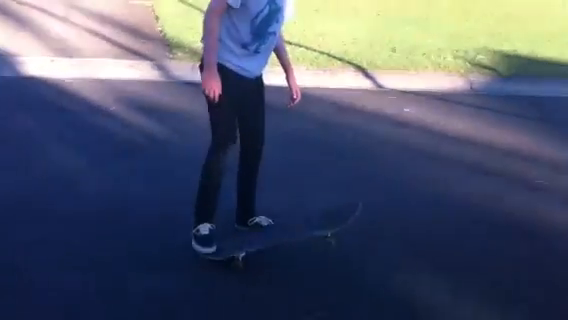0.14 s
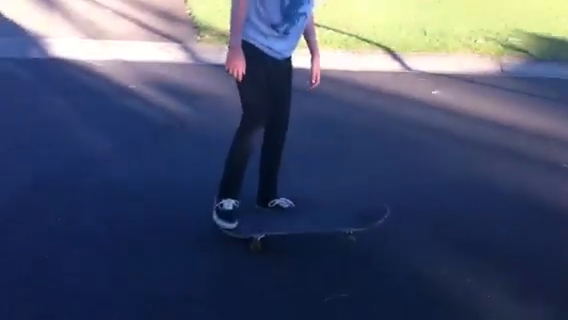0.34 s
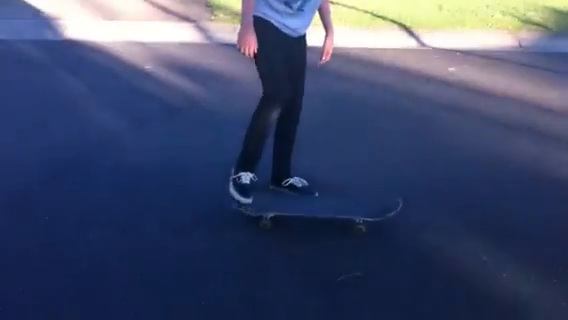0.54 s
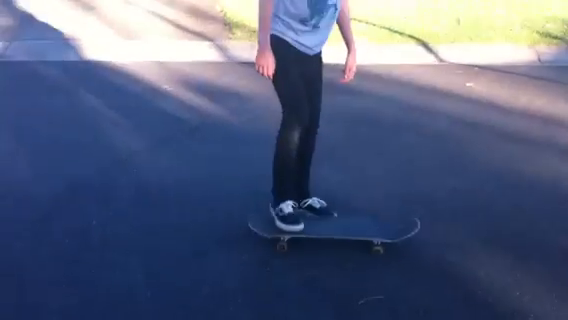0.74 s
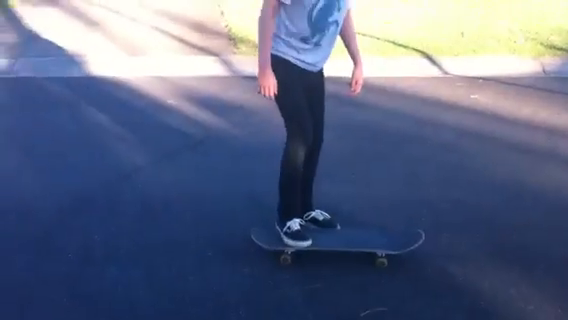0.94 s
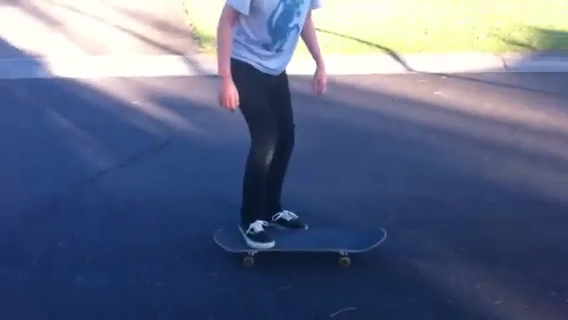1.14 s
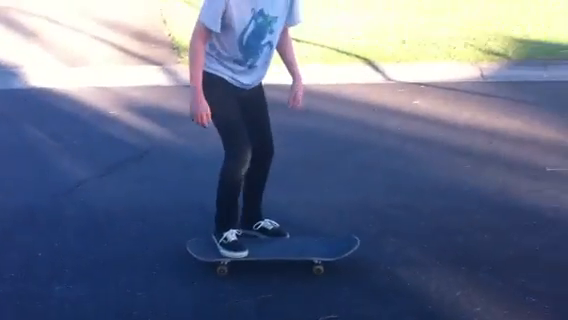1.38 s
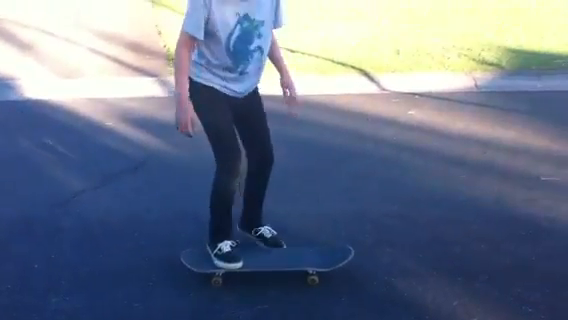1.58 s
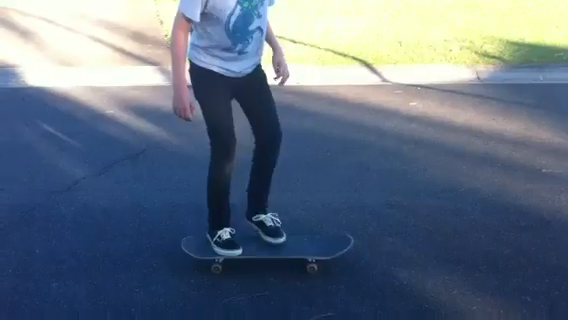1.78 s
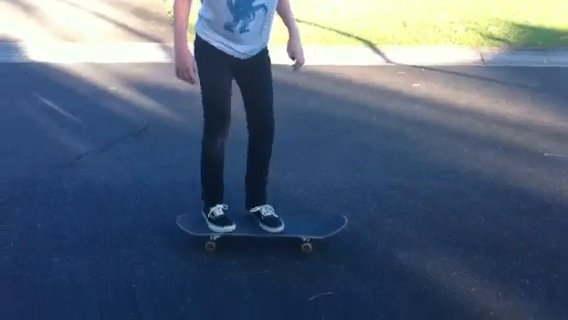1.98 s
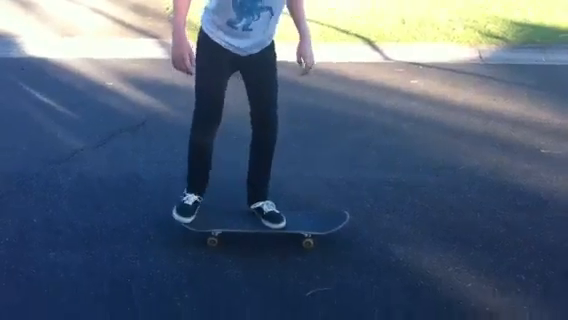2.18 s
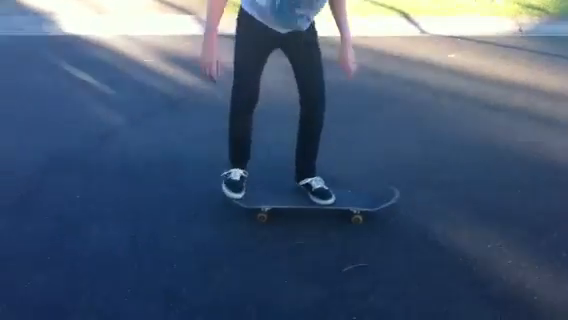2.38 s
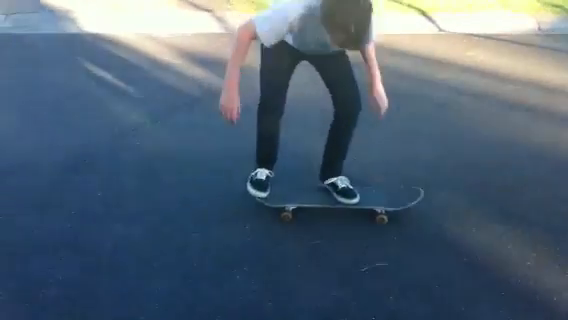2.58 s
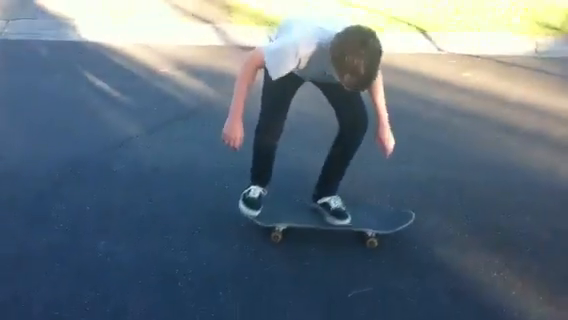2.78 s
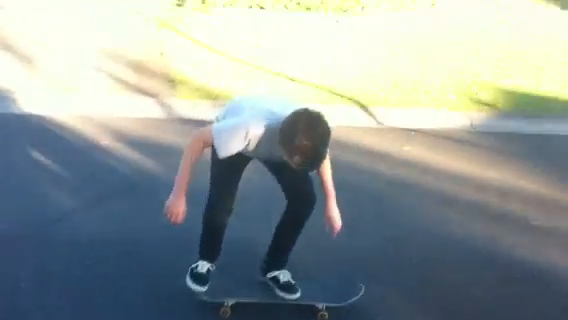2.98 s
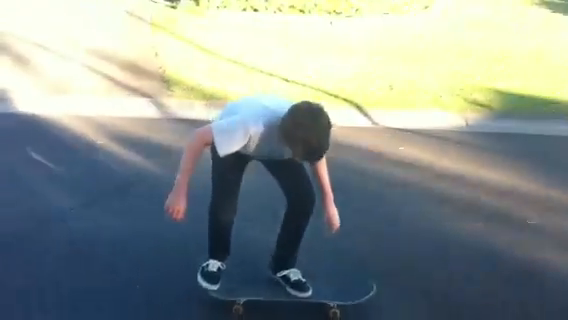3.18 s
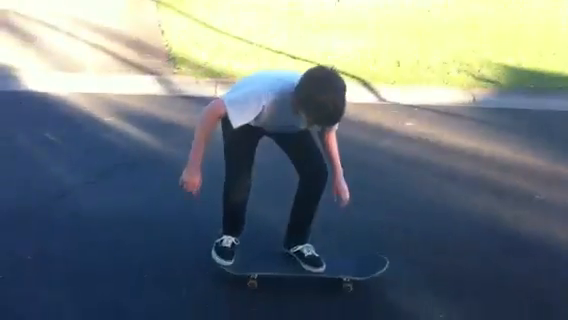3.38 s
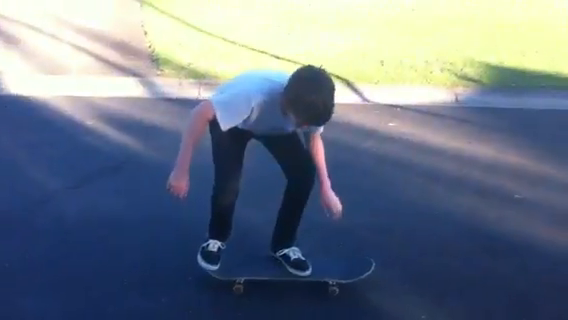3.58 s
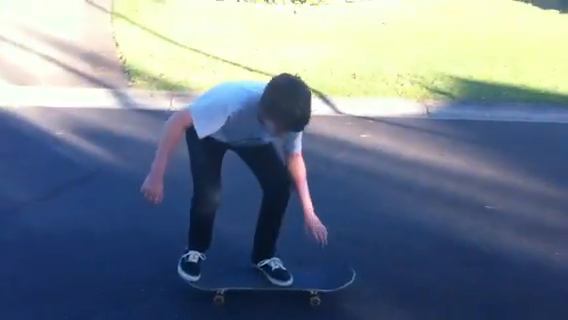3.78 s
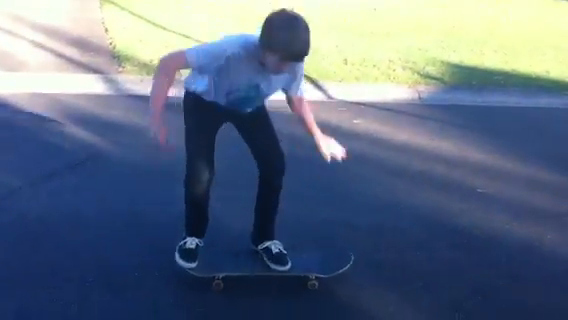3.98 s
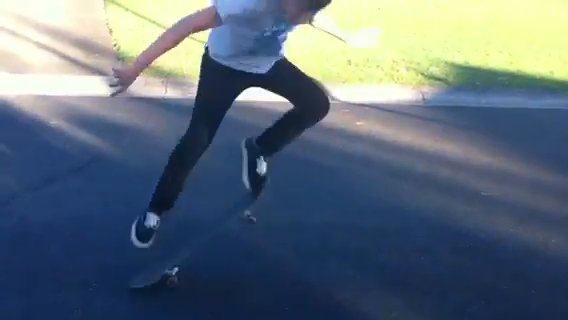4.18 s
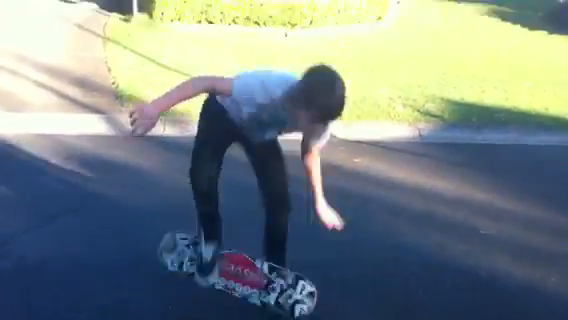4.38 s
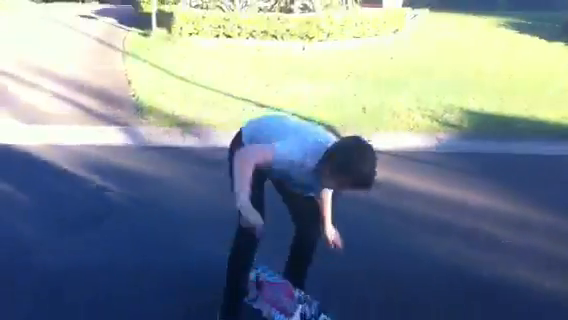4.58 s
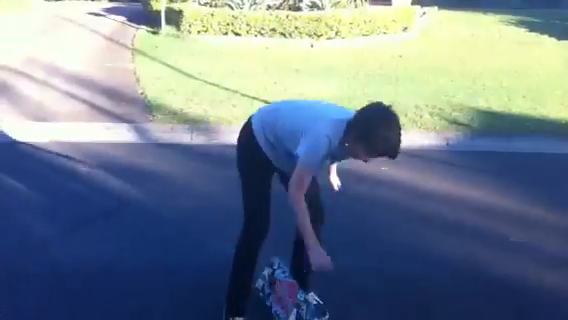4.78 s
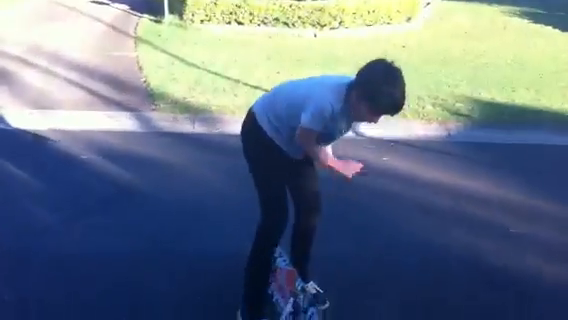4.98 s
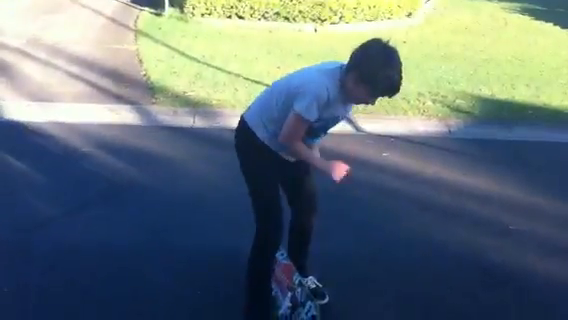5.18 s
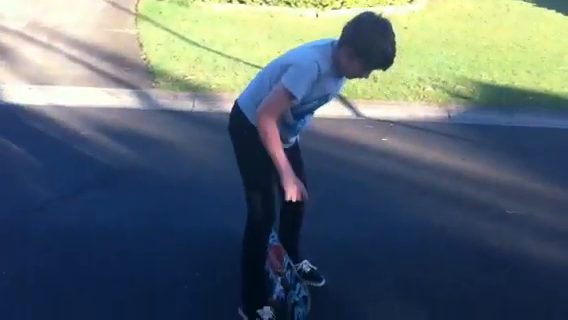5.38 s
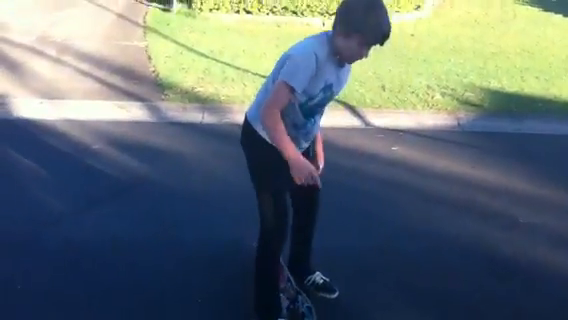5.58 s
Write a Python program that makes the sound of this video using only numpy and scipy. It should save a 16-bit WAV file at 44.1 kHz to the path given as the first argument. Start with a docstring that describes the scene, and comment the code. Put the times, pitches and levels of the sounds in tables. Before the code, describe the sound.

A close skateboard clacks down and rolls gently over asphalt, with light taps and hollow thumps from the rider's shoes. Birds screech, a few loudly and others far off. After a tail pop and a rasp of rubber on grip tape, the board hits the road hard, bounces and rattles to a stop, its wheels spinning down. One small microphone catches each knock echoing briefly around the hushed residential street.

```python
"""A quiet street between houses, one small microphone close to a skateboard rolling slowly on asphalt.
The front wheels slap down and the rider shuffles his feet. He pops the tail, his shoe scrapes up the
grip tape, and the board crashes onto the road and clatters to rest, deck, wheels and trucks ringing
at each blow. Birds screech, a few loud and several faint and far off; the houses throw every knock
back."""
import sys
import numpy as np
from scipy import signal
from scipy.fft import rfft, irfft, next_fast_len
from scipy.io import wavfile

SR = 44100
rng = np.random.default_rng(int(sys.argv[2]) if len(sys.argv) > 2 else 0)


def bounce(signal):
    """Save signal as a 16-bit WAV file at the path given by the first command-line argument."""
    frames = np.transpose(np.atleast_2d(signal))
    limited = np.clip(frames, -1, 1)
    pcm = np.round(limited * 32767).astype(np.int16)
    wavfile.write(sys.argv[1], SR, pcm)


N = 248633
TIME = np.arange(N) / SR
CUTOFF_HZ = 16000

# wheel slaps, shuffling feet, tail pop, crash and clatter:
# start_s, force_db, hardness_db_per_octave, favoured_hz (by the spot struck), favour_db
BLOWS = [ (.617, -36.5, 5.5, 685, 14.5), (0.6183, -40.5, 0, 2408, 29), (0.6258, -43, 4.5, 1115, 7.5),
         (0.634, -47, 1, 696, 4.5), (.649, -54, 4, 1200, 8), (.717, -53, 2, 1095, 2.5),
         (.801, -78, 9.5, 8930, 9), (0.951, -50, -1, 600, 8), (0.9587, -46.5, 3.5, 2340, 8),
         (.976, -67, 3.5, 2337, 1.5), (.989, -57, 1, 2313, 8), (1.0139, -48.5, 3.5, 1020, 9),
         (1.03, -72, 3, 2340, 26), (1.087, -63.5, 5, 9000, 3.5), (1.127, -66.5, 4.5, 960, 14.5),
         (1.663, -63, 5.5, 2350, 9), (1.714, -69, 6.5, 2336, 13), (1.993, -46, -3.5, 396, 6),
         (2.245, -45, 0.95, 2224, 11), (2.875, -70, 2, 2150, 13.5), (3.074, -59, -1.5, 1800, 11.5),
         (4.15, -48, 3, 4700, 4.5), (4.203, -53.5, -5, 1127, 6), (4.166, -50, 1, 960, -2),
         (4.29, -49, 0, 8930, 7.5), (4.297, -37.5, 0, 1475, 5.5), (4.304, -42, 0.5, 2335, 8.5),
         (4.332, -51, 1.5, 1200, 2), (4.427, -50, 1.5, 1100, 1.5), (4.4987, -21.5, 0.3, 1700, 7.5),
         (4.612, -41.5, 1.5, 350, 16), (4.6292, -47, -2, 1005, 9.5), (4.7325, -24.5, -0.1, 890, 9),
         (4.757, -34.5, 3, 4720, 10), (4.8141, -52, 5.5, 4690, 7), (4.859, -49.5, 0.5, 900, 8),
         (4.886, -56.5, 2.5, 1475, 8), (4.935, -55.5, 1, 1397, 1.5), (4.956, -58, 0.5, 1824, 6),
         (4.995, -55, 3, 960, 8), (5.038, -56, 1.5, 1400, 0.5), (5.1652, -53.5, -0.6, 1300, 5)]
# the board's parts (deck flex, deck knock, deck slap, wheel clack, truck ring, grit tick):
# low_hz, high_hz, build_up_s, crack_t60_s, crack_db, rattle_db (both against the modes)
PARTS = [(174, 620, 0.00053, 0.12, -6, -27.5), (610, 1200, 0.0013, 0.015, -7, -11.5),
         (1200, 1850, .001, 0.04, 7, -30.5), (2000, 2450, 0.00033, .02, -4.5, -39),
         (4350, 5770, 0.0027, 0.013, 3.5, -6), (7900, 12500, 0.00029, 0.022, -8.5, -9)]
# how much of a blow each part takes, in the same order: share_db
PART_SHARES = [-6, -1, -1.5, -6, -12, -11.5]
# modes of deck, wheels and trucks: pitch_hz, level_db, t60_s
BOARD_MODES = [(178, -21, 0.2), (247, -11.5, 0.12), (339.5, -6.5, 0.08), (454, -1.5, 0.044),
               (575, 1.5, 0.021), (685, -9.5, 0.08), (917, 2, 0.022), (960, -6.5, 0.04), (1087, 3.5, 0.024),
               (1194, -7.5, 0.074), (1475, -2.5, 0.026), (1813, -6.5, 0.018), (2150, -1, 0.028),
               (2370, 1.5, 0.021), (4576, 0.5, 0.0088), (4660, -11.5, .035), (5160, -3, 0.01),
               (5800, -20.5, .025), (7400, 11, 0.036), (8520, -6.5, 0.012), (8470, -0.5, 0.011),
               (9190, -3, 0.022), (9820, -6.5, 0.012), (11420, -22, 0.0039), (16200, -13, .012)]
# hollow low thumps, one trailed by faint echoes, and the thuds of the jump and landing:
# peak_s, pitch_hz, level_db, width_s
THUMPS = [(1.797, 116.6, -55.5, 0.0064), (2.665, 295, -35, 0.0044), (2.81, 320, -50, 0.0053),
          (2.805, 525, -56.5, 0.011), (2.938, 314, -53.5, 0.014), (3.011, 293, -56, .012),
          (3.194, 123, -55, 0.0071), (3.662, 443, -40.5, 0.0015), (3.811, 309, -39.5, 0.0063),
          (4.197, 283, -49, 0.016), (4.294, 307, -40, 0.0043), (4.503, 34, -53, .008),
          (4.726, 34.2, -61, .008)]
# how hard the wheels roll on the asphalt: time_s, level_db
ROLL_LEVEL = [(0, -68), (.5, -65), (1.45, -65), (1.7, -67.5), (2.25, -69.5), (2.6, -61.5), (3.03, -61.5),
              (3.2, -68.5), (3.5, -62.5), (4.1, -68), (5.25, -79.5), (5.64, -75)]
# jolts that leave the unloaded wheels spinning: start_s, level_db
SPINS = [(4.16, -53.5), (4.29, -48), (4.51, -46.5), (4.77, -48)]
# spectrum of the shaken deck: frequency_hz, relative_db
RUMBLE_SPECTRUM = [(18, -56), (30, -42.5), (118, -10.5), (178, -4.5), (205, -2.5), (238, -6), (313, -12),
                   (387, -12), (424, -8), (517, -14.5), (700, -22), (910, -42.5), (1540, -120)]
# spectrum of wheels grinding over stones: frequency_hz, relative_db
GRIND_SPECTRUM = [(290, -44), (500, -18), (628, -7), (828, -0.5), (936, 3.5), (1390, -2.5), (1440, -2),
                  (2270, -5), (2900, -16), (3170, -26), (3500, -9.5), (4550, -48), (7700, -120)]
# shoe strokes along the grip tape: start_s, length_s, level_db
SCRAPES = [(.942, 0.021, -56), (1.405, 0.017, -62.5), (2.135, 0.012, -58.5), (3.495, 0.018, -58),
           (4.085, 0.19, -56), (4.23, 0.02, -45.5), (4.285, 0.031, -46), (4.38, 0.068, -64.5),
           (5.54, 0.061, -63.5)]
# a sole twisting on the tape: start_s, length_s, relative_db
TWISTS = [(.418, .005, -59.5), (3.5, .056, -56), (4.091, .005, -57), (4.245, .005, -55)]
# spectrum of rubber on grip tape: frequency_hz, relative_db
GRIP_SPECTRUM = [(150, -21), (286, 1), (420, -14.5), (750, 0), (1020, -4.5), (1600, -4.5), (2300, -0.5),
                 (3100, -13.5), (4200, -12), (5600, -7.5), (6900, -20.5), (9400, -6.5), (12500, -23),
                 (16000, -26.5)]
# bird screeches, a few loud and several faint and far off:
# start_s, length_s, start_hz, middle_hz, end_hz, level_db, shake_share, overtone_db
BIRD_CALLS = [ (.08, 0.16, 2960, 3420, 3560, -70, 0.083, -6),
              (0.17, 0.3, 4740, 4880, 4850, -68.5, 0.059, -6),
              (1.789, 0.044, 1950, 2620, 2780, -55, 0.023, 3),
              (2.214, 0.15, 2150, 2620, 3060, -54, 0.063, -4.5),
              (2.338, .13, 2790, 2720, 2980, -58, 0.054, 0),
              (2.315, 0.13, 3830, 3960, 3930, -53, 0.031, -9.5),
              (2.432, 0.102, 3920, 4015, 4060, -51, 0.017, -18.5),
              (2.503, 0.13, 2050, 2500, 2720, -72, .02, -10),
              (2.629, .17, 2314, 2950, 2620, -65.5, .018, -7),
              (3.575, 0.13, 2300, 2730, 2450, -70, 0.038, -6),
              (4.0, 0.33, 5800, 5990, 6000, -68, 0.035, -3)]
# how a bird's throat weights the harmonics: frequency_hz, gain_db
THROAT_SPECTRUM = [(2500, 4.5), (4100, -6), (5500, 5.5), (8000, -6.5), (12000, -13.5), (16000, -38)]
# tone of the street's echo: frequency_hz, gain_db
ECHO_SPECTRUM = [(100, -25), (280, -9.5), (600, -21), (1100, -10.5), (2200, -27), (4500, -17.5),
                 (9000, -16), (15000, -18.5)]
# decay of the street's echo: frequency_hz, t60_s
ECHO_DECAY = [(150, 1), (400, 0.69), (1200, 0.42), (2500, 0.61), (6000, 0.82), (9500, 0.39), (15000, .42)]
# spectrum of the still street: frequency_hz, relative_db
AIR_SPECTRUM = [(25, -28), (55, -27.5), (80, -25.5), (170, -11), (430, -8), (950, -7.5), (1450, -10.5),
                (2300, -17), (3000, -27.5), (4800, -18), (7000, -33), (9000, -28), (16000, -26.5)]


def board(mode_spread_db=-0.55, rattle_t60_s=0.16, rattle_per_s=400, scattered_ring_db=-6,
          snap_db=-21, snap_t60_s=0.025):
    """Each blow rings the modes of every part, crushes grit and shakes the loose hardware.
    Returns the sound towards the microphone and the more even sound sent in all other directions."""
    direct, scattered = np.zeros(N), np.zeros(N)
    t = np.arange(SR // 8) / SR
    onset = round(0.012 * SR)   # the first 12 ms set a blow's level
    starts = [blow[0] for blow in BLOWS]
    shape = (len(BLOWS), len(t))   # one row per blow
    for part, share_db in zip(PARTS, PART_SHARES):
        low, high, build_up_s, crack_t60_s, crack_db, rattle_db = part
        contact = 1 - np.exp(-(t / build_up_s) ** 2)   # force builds as the contact flattens
        top_hz = np.inf if high == PARTS[-1][1] else high   # the grit tick takes all the highest modes
        modes = [mode for mode in BOARD_MODES if low <= mode[0] < top_hz]
        energies = [from_db(db) ** 2 * t60 for _, db, t60 in modes]
        powers = [blow_drive(hz) ** 2 for hz, _, _ in modes]
        part_drive = np.sqrt(np.average(powers, axis=0, weights=energies))
        ring = 0
        for hz, db, t60 in modes:
            mode_db = db + mode_spread_db * rng.standard_normal(len(BLOWS))
            strength = blow_drive(hz) / part_drive * from_db(mode_db)
            phase = 2 * np.pi * hz * t + rng.uniform(0, 2 * np.pi, (len(BLOWS), 1))
            ring += strength[:, None] * np.sin(phase) * contact * decay(t, t60)
        crack = band(rng.standard_normal(shape) * contact * decay(t, crack_t60_s), low, high)
        # washers and bearings chatter
        touches = rng.standard_normal(shape) * (rng.random(shape) < rattle_per_s / SR)
        rattle = band(touches * contact * decay(t, rattle_t60_s), low, high)
        grit = from_db(crack_db) * unit_rms(crack) + from_db(rattle_db) * unit_rms(rattle)
        for out, ring_gain in (direct, 1), (scattered, from_db(scattered_ring_db)):
            knocks = ring_gain * unit_rms(ring) + grit
            for start_s, gain, knock in zip(starts, from_db(share_db) * part_drive, knocks):
                add(out, start_s, gain * knock / knock[:onset].std())
    # stones crunch across the whole treble, building up as fast as the grit tick
    snaps = band(rng.standard_normal(shape) * contact * decay(t, snap_t60_s), 2400, 17000, order=1)
    for start_s, gain, snap in zip(starts, from_db(snap_db) * blow_drive(6500), snaps):
        for out in direct, scattered:
            add(out, start_s, gain * snap / snap[:onset].std())
    return band(np.array([direct, scattered]), 115, 19000)   # a narrow deck radiates little bass


def blow_drive(hz, pivot_hz=1300, favour_octaves=0.24):
    """Each blow's drive at a pitch: hard contacts reach higher, the spot struck favours one region."""
    _, force_db, hardness, favoured_hz, favour_db = np.transpose(BLOWS)
    nearness = np.exp(-(np.log2(hz / favoured_hz) / favour_octaves) ** 2)
    return from_db(force_db + hardness * np.log2(hz / pivot_hz) + favour_db * nearness)


def thumps():
    """Each hollow thump or faint echo swells and dies within a few cycles of one low resonance."""
    out, t = np.zeros(N), np.arange(-SR // 20, SR // 20) / SR
    for peak_s, hz, db, width_s in THUMPS:
        swell = from_db(db) / np.cosh(t / width_s * np.pi / 2)
        add(out, peak_s + t[0], swell * np.cos(2 * np.pi * hz * t))
    return out


def wheels(cruise_db=-66, rumble_follows=0.39, rumble_db=1.5, shudder_db=-12, grind_db=-2,
           sand_db=-6.5, bearing_db=-8, wobble_db=3.5):
    """Stones in the asphalt shake the deck and rattle the wheels; fine sand crackles under them.
    Off the ground the bearings whirr and run down."""
    roll_db = np.interp(TIME, *np.transpose(ROLL_LEVEL))
    spin = sum(from_db(db) * stroke(start_s, length_s=0.0083, attack_s=0.0083, t60_s=0.9)
               for start_s, db in SPINS)
    turning = np.hypot(from_db(roll_db), spin)
    # the deck follows only part of the swing about an easy pace
    shake = from_db(cruise_db + rumble_follows * (roll_db - cruise_db) + rumble_db)
    rumble = np.hypot(shake, from_db(shudder_db) * spin) * colour(grains(2500, 2.6), RUMBLE_SPECTRUM)
    patches_db = 0.8 * drift(14)
    grind = turning * from_db(grind_db + patches_db) * colour(grains(7000, 1.2), GRIND_SPECTRUM)
    sand = shake * from_db(sand_db) * unit_rms(band(grains(11000, 2.8), 1600, 11000, order=1))
    whirr = unit_rms(band(grains(900, 2), 1950, 2450))
    bearings = turning * from_db(bearing_db + wobble_db * drift(9)) * whirr
    return rumble + grind + sand + bearings


def shoes(flicker_db=0.6, tear_db=-6, slip_every_s=0.0123, tick_t60_s=0.017):
    """Rubber catches and slips on the grains of the grip tape; a twisting sole ticks at each slip."""
    pressure = sum(from_db(db) * stroke(start_s, length_s, attack_s=0.015, t60_s=0.27)
                   for start_s, length_s, db in SCRAPES)
    out = pressure * from_db(flicker_db * drift(60)) * colour(grains(4400, 2.4), GRIP_SPECTRUM)
    tearing = unit_rms(band(grains(2500, 2.2), 9590, 15450))   # the hardest strokes tear grains off
    out += from_db(tear_db) * pressure ** 2 / pressure.max() * tearing
    t = np.arange(SR // 50) / SR
    for start_s, length_s, db in TWISTS:
        for slip_s in np.arange(start_s, start_s + length_s, slip_every_s):
            tick = unit_rms(band(rng.standard_normal(len(t)), 1200, 3800, order=1))
            add(out, slip_s, 2 * from_db(db) * tick * decay(t, tick_t60_s))
    return out


def birds(shake_hz=420, flutter_db=3.5, rasp_db=-11):
    """Screeches: a few harmonics on an arching, fast-shaking pitch, widened by a rasp."""
    out = np.zeros(N)
    for start_s, length_s, start_hz, middle_hz, end_hz, db, shake, overtone_db in BIRD_CALLS:
        size = round(length_s * SR)
        progress = np.linspace(0, 1, size)
        arch = np.polyfit([0, 0.5, 1], [start_hz, middle_hz, end_hz], 2)
        hz = np.polyval(arch, progress)
        phase = 2 * np.pi * np.cumsum(hz * (1 + shake * drift(shake_hz, size))) / SR
        voice = 0
        for k in range(1, 5):
            harmonic_db = at_hz(THROAT_SPECTRUM, k * hz) + overtone_db * (k > 1)
            voice += from_db(harmonic_db) * (k * hz < CUTOFF_HZ) * np.sin(k * phase)
        voice *= 1 + from_db(rasp_db) * drift(720, size)
        swell = np.interp(progress, [0, 0.26, 0.7, 1], [0, 1, 1, 0])
        level = from_db(db + flutter_db * drift(140, size))
        add(out, start_s, unit_rms(voice) * swell * level)
    return out


def street_echo(sound, near_db=5.5, near_t60_s=0.056, build_up_s=0.013):
    """Close scatter from rider, road and kerb comes first, then the long wash from the houses."""
    t, response = np.arange(SR) / SR, 0
    arrival = 1 - np.exp(-(t / build_up_s) ** 2)
    edges_hz = np.geomspace(90, 16000, num=14)
    for low, high in zip(edges_hz, edges_hz[1:]):
        hz = np.sqrt(low * high)
        fade = decay(t, at_hz(ECHO_DECAY, hz)) + from_db(near_db) * decay(t, near_t60_s)
        wash = band(rng.standard_normal(SR) * fade * arrival, low, high)
        wash *= np.sqrt(2 * (high - low) / SR / np.sum(wash ** 2))   # unit gain within the band
        response += from_db(at_hz(ECHO_SPECTRUM, hz)) * wash
    return signal.fftconvolve(sound, response)[:N]


def street_air(level_db=-66.5):
    """The steady hush of the still street behind everything."""
    return from_db(level_db) * colour(rng.standard_normal(N), AIR_SPECTRUM)


def grains(per_s, spread_db):
    """Random clicks of uneven size: stones and grit being touched."""
    sizes = from_db(spread_db * np.minimum(rng.exponential(1, N), 4))
    return sizes * rng.choice([-1, 1], N) * (rng.random(N) < per_s / SR)


def drift(rate_hz, size=N):
    """Smooth random wander; rms 1."""
    pole = np.exp(-2 * np.pi * rate_hz / SR)
    wander = signal.lfilter([1], [1, -2 * pole, pole * pole], rng.standard_normal(size + SR))
    return unit_rms(wander[SR:])


def stroke(start_s, length_s, attack_s, t60_s):
    """Envelope that rises, holds to the end of its length and dies away."""
    rise = np.clip((TIME - start_s) / attack_s, 0, 1)
    return rise * decay(np.maximum(TIME - start_s - length_s, 0), t60_s)


def decay(t, t60_s):
    """Lose 60 dB in t60_s."""
    return np.exp(-np.log(1000) * t / t60_s)


def colour(x, spectrum):
    """Give a steady excitation a spectrum; rms 1."""
    size = next_fast_len(N)
    gain = from_db(at_hz(spectrum, np.fft.rfftfreq(size, 1 / SR)))
    return unit_rms(irfft(rfft(x, size) * gain, size)[:N])


def band(x, low_hz, high_hz, order=2):
    """Causal band-pass."""
    return signal.sosfilt(signal.butter(order, [low_hz, high_hz], "band", fs=SR, output="sos"), x)


def at_hz(curve, hz):
    """Read a curve on a log-frequency axis."""
    points_hz, values = np.transpose(curve)
    return np.interp(np.log(np.maximum(hz, 1)), np.log(points_hz), values)


def from_db(db):
    """Decibels to gain."""
    return 10 ** (np.asarray(db) / 20)


def unit_rms(x):
    """Scale to rms 1."""
    return x / np.sqrt(np.mean(x ** 2) + 1e-20)


def add(out, start_s, sound):
    """Mix a sound in from start_s."""
    i = max(round(start_s * SR), 0)
    out[i:i + len(sound)] += sound[:N - i]


def scene(thump_echo_db=9.5, shoe_echo_db=-15, bird_echo_db=5):
    """At the microphone: knocks, rider and birds share the street's echo; the rolling stays dry."""
    knocks, scattered = board()
    thuds, scrapes, calls = thumps(), shoes(), birds()
    echo = street_echo(scattered + from_db(thump_echo_db) * thuds
                       + from_db(shoe_echo_db) * scrapes + from_db(bird_echo_db) * calls)
    air = street_air()
    return (knocks + thuds + wheels() + scrapes + calls + echo + air)[None]


def record(dry):
    """One small microphone with a steeply cut top."""
    return signal.sosfilt(signal.ellip(10, 0.1, 80, CUTOFF_HZ, fs=SR, output="sos"), dry)


dry = scene()
out = record(dry)
bounce(out)
```